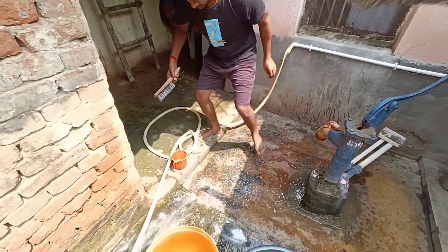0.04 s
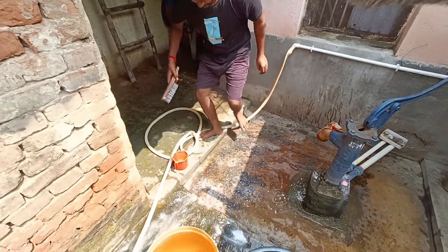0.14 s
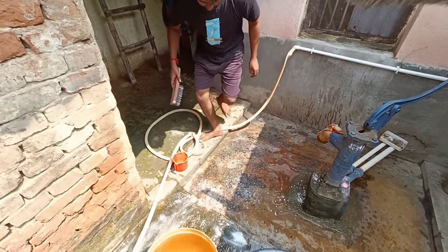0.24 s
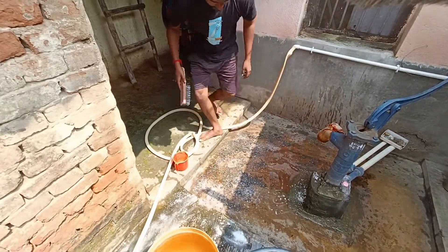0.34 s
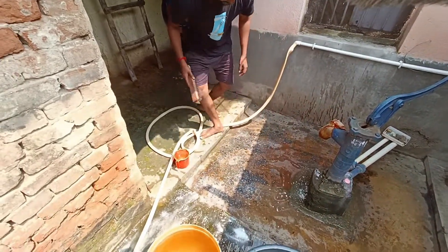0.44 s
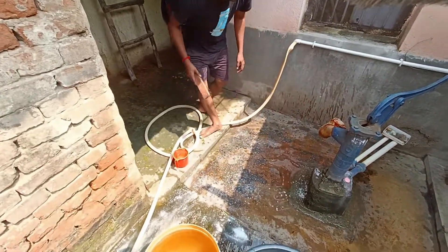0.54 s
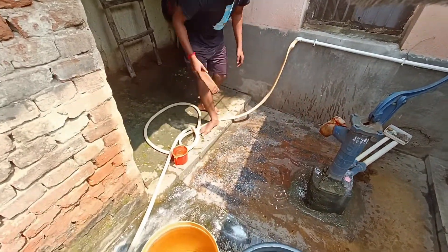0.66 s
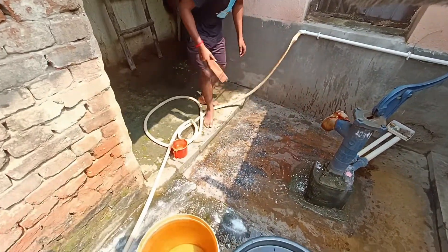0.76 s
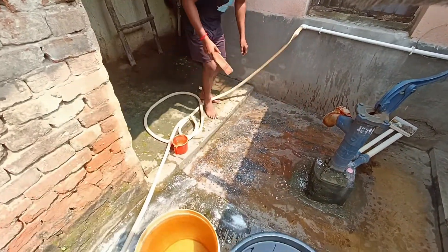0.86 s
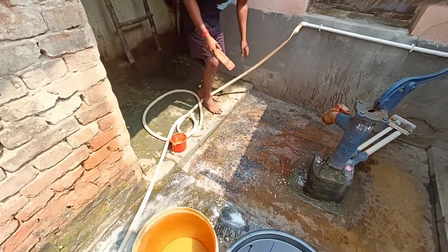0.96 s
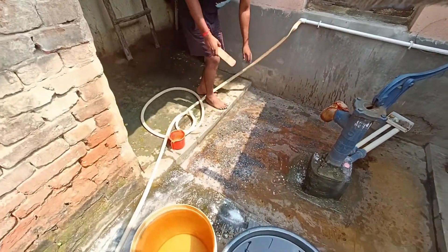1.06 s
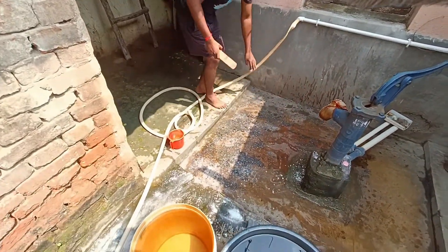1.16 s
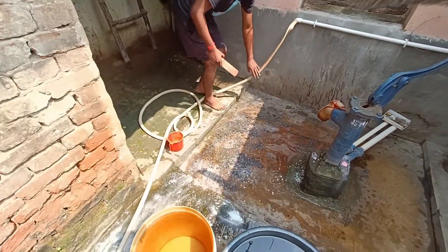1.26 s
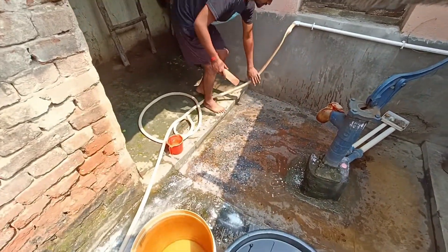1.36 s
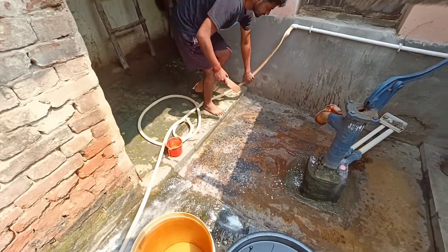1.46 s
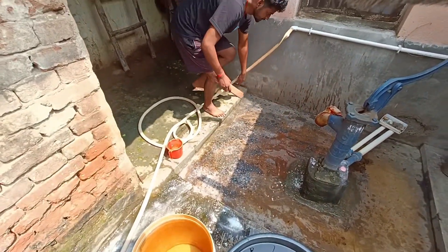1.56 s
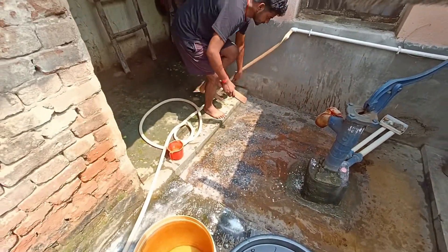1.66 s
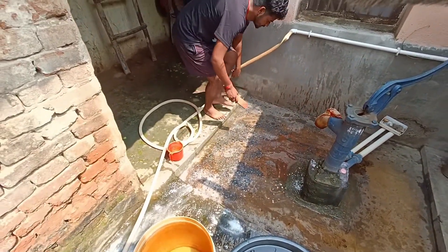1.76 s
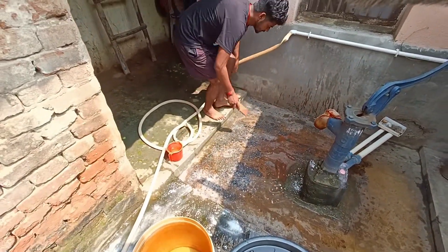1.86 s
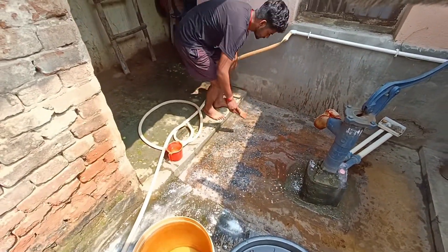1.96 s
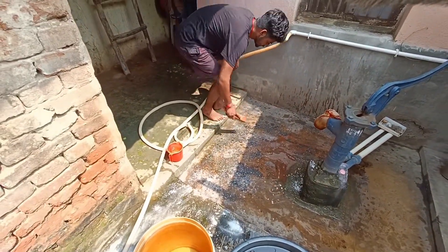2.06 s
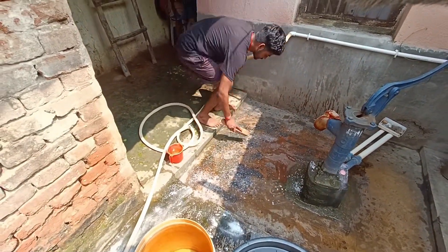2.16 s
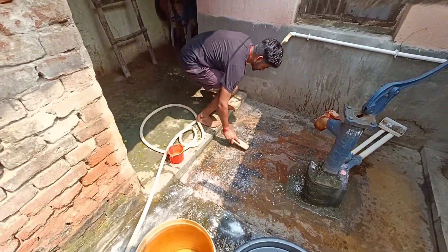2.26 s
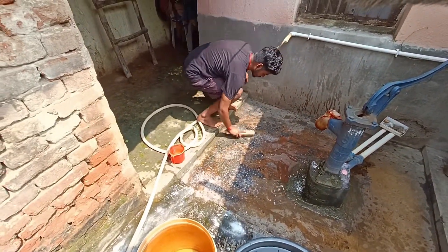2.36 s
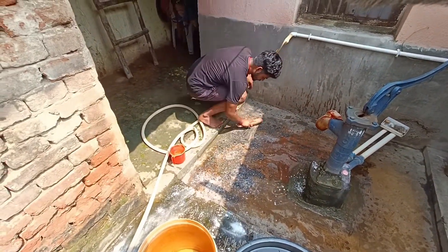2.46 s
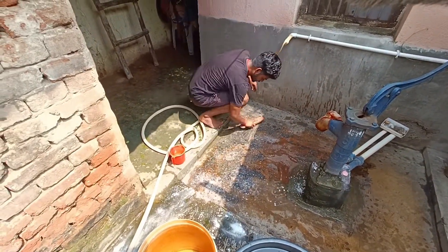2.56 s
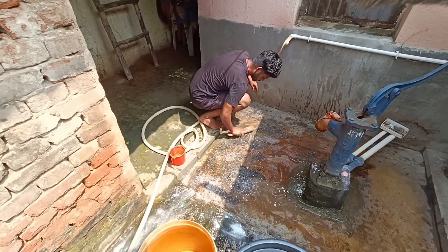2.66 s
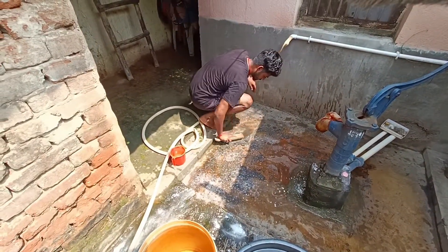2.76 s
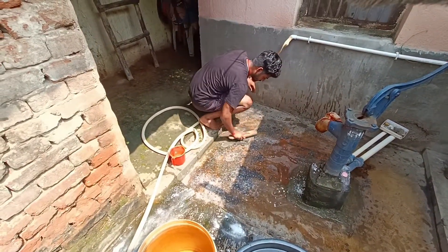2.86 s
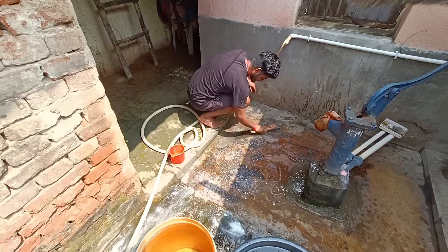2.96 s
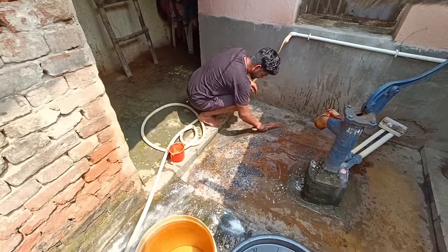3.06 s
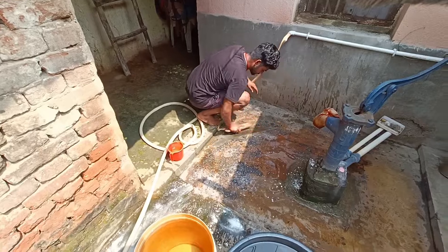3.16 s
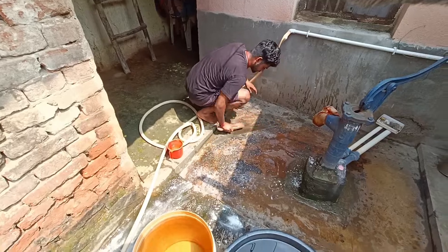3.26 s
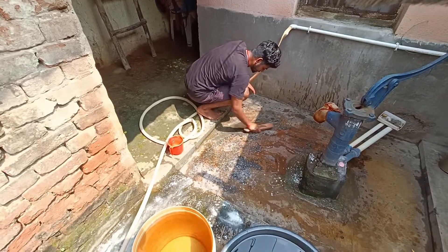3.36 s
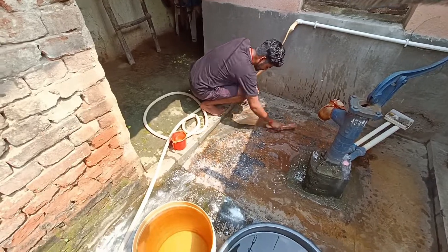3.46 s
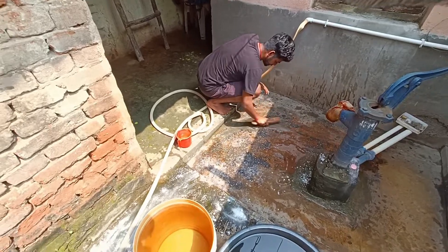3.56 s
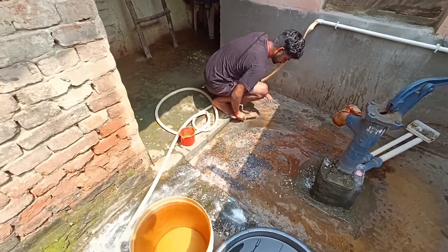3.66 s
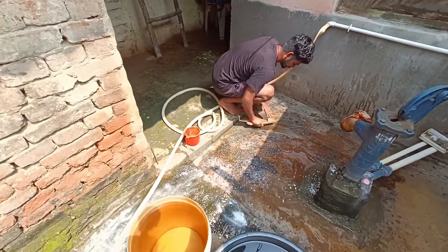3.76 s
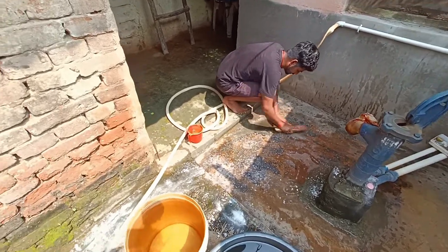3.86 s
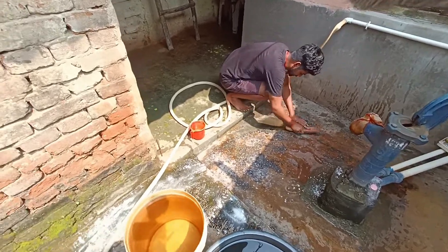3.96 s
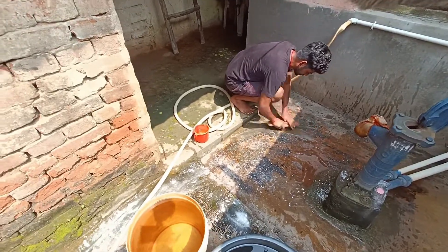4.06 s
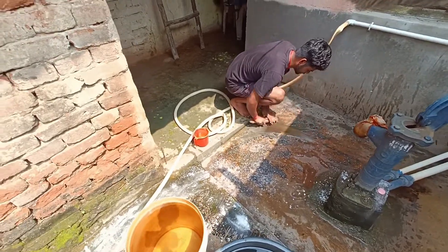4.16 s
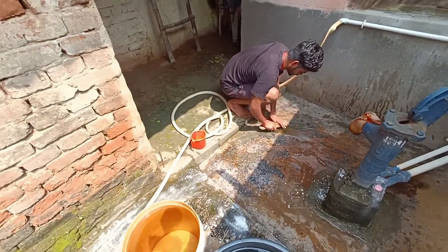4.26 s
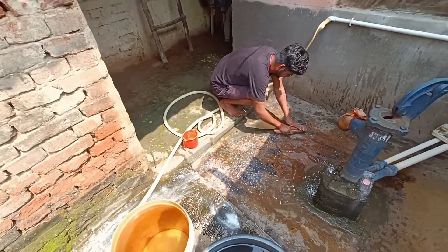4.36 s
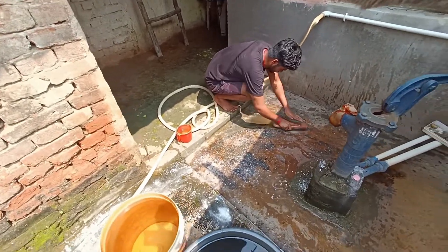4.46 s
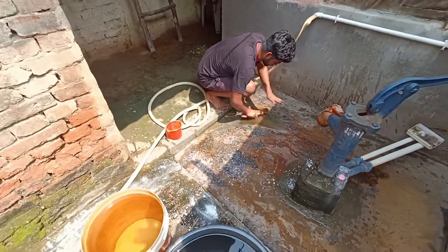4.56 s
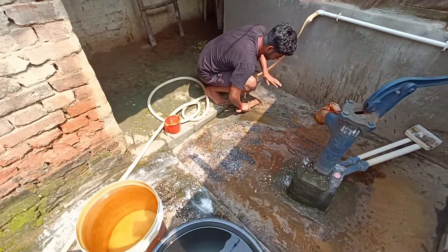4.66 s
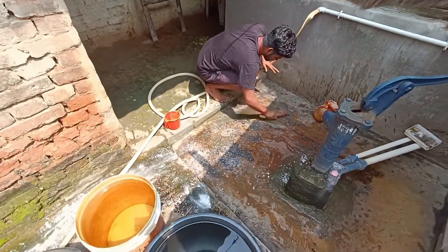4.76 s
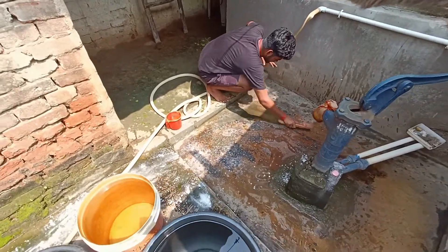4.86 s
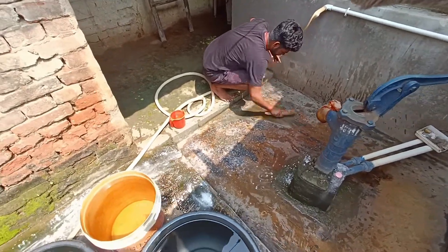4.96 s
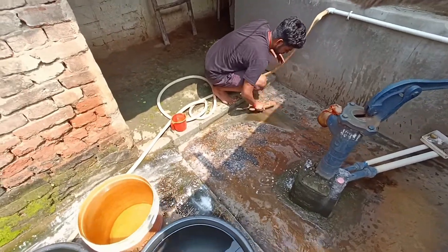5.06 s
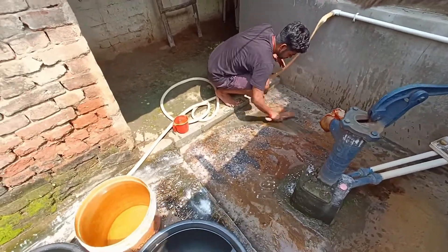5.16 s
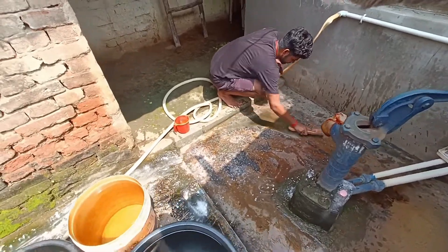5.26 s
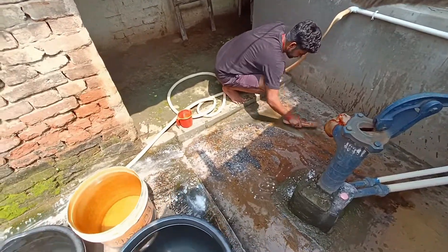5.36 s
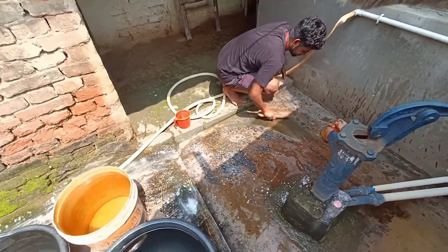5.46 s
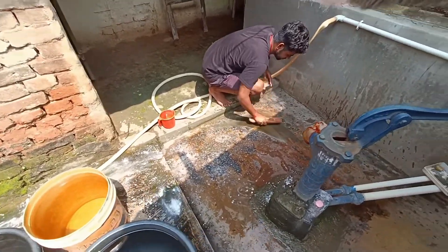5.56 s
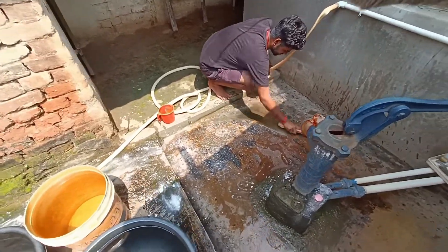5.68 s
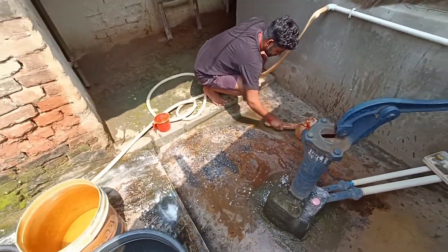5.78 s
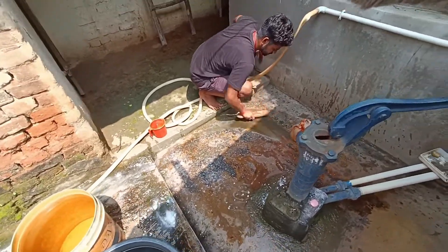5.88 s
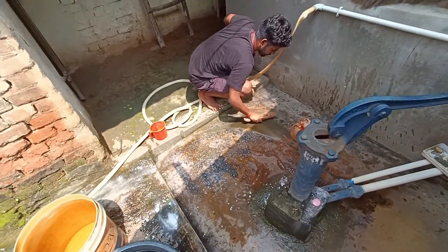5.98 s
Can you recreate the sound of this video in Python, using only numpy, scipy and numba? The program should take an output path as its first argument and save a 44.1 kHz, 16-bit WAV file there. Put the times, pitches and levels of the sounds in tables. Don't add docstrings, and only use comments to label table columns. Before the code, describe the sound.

A small walled yard, heard a few metres away on a phone, nearly mono, with a very short diffuse tail. Faint low hum, soft air hiss and swelling wind rumble run throughout. At 0.05 s a wet foot makes a bright tick; at 0.6 s comes the loudest step tap, another tap at 0.8, and gritty shuffling until about 1.1. Faint taps and scuffs follow at 1.25 to 1.6, then a cluster of small wet clicks and scuffs from 2.1 to 2.4. At 2.4 s the wooden brush lands with a short knock. From 2.45 s it scrubs in quick back-and-forth strokes, roughly every quarter second, becoming slightly faster and stronger. Bristles rasp with a bright scratchy ring, water hisses off them, and the block's hollow woody rattle and soft bumps thin out as the grip tightens. Low wind puffs thud near 4.1 and 5.4; scrubbing continues to the cut at 6 s.

```python
import sys
import numpy as np
from scipy import signal
from scipy.fft import rfft, irfft, next_fast_len
from scipy.io import wavfile
from scipy.ndimage import uniform_filter1d
from numba import njit

SR = 44100
rng = np.random.default_rng(int(sys.argv[2]) if len(sys.argv) > 2 else 0)


def invert_db(x):
    u = np.asarray(x, float) / 20
    return 10 ** u


def master_out(mix):
    frames = np.transpose(np.atleast_2d(mix))
    ceiling = np.clip(frames, -1, 1)
    pcm = np.round(ceiling * 32767).astype(np.int16)
    wavfile.write(sys.argv[1], SR, pcm)


N = 265482
LANDING_S = 2.397


def level(x, db):
    return x * invert_db(db) / np.sqrt(np.mean(x ** 2))


def to_db(gain):
    return 20 * np.log10(np.maximum(gain, 10 ** -5.5))


def colour(x, points):
    size = next_fast_len(N)
    hz, db = np.transpose(points)
    bins_hz = np.arange(size // 2 + 1) * SR / size
    gain = invert_db(np.interp(np.log(bins_hz + 1), np.log(hz), db, -120, -120))
    return level(irfft(rfft(x, size) * gain, size)[:N], 0)


@njit
def svf(x, hz, width):
    y, band, low = np.empty(len(x)), 0., 0.
    for i in range(len(x)):
        g, k = np.tan(np.pi * hz[i] / SR), width / hz[i]
        v = (band + g * (x[i] - low)) / (1 + g * (g + k))
        band, low, y[i] = 2 * v - band, low + 2 * g * v, k * v
    return y


def walk(rate):
    k = int(SR / rate)
    held = np.repeat(rng.standard_normal(N // k + 1), k)
    return 1.09 * uniform_filter1d(uniform_filter1d(held, k), k)[:N]


def snaps(share, spread_db, bunch_db, bunch_rate):
    when, sign, size = rng.random(N), rng.standard_normal(N), rng.exponential(size=N)
    return (when < share) * sign * invert_db(spread_db * size + bunch_db * walk(bunch_rate))


def rings(x, centre_hz, width_hz, count, spread, patchy_db, rate):
    out = 0
    for offset in np.linspace(-1, 1, count):
        hz = np.clip(centre_hz * np.exp(spread * (offset + 0.323 * walk(rate / 2))), 100, 9000)
        out = out + invert_db(patchy_db * walk(rate)) * svf(x, hz, width_hz)
    return level(out, 0)


def swing(share, fastest):
    bent = np.clip(share, 0, 1) ** (np.log(.5) / np.log(fastest))
    return np.maximum(np.sin(np.pi * bent), 0)


def hand():
    # start in seconds, spray level in dB, share of the stroke (0-1) where it is fastest,
    # tuft ring level in dB, rise of that ring along the stroke in dB. A stroke ends where the next begins.
    strokes = [(2.443, -35.5, 0.47, -38, 0), (2.711, -37, 0.54, -40.5, 4), (2.959, -35, 0.28, -34.5, 1),
               (3.208, -34, 0.47, -36.5, -6.5), (3.415, -33.5, .33, -35, 1.5),
               (3.645, -32.5, 0.46, -35, -2.5), (3.875, -34.5, 0.38, -35, 6.5), (4.124, -34, 0.43, -34, 6),
               (4.366, -34, 0.4, -33.5, 6), (4.616, -32, 0.47, -32, 2.5), (4.818, -33.5, 0.41, -31, 3),
               (5.044, -32.5, 0.55, -33, 8.5), (5.264, -33.5, 0.3, -32.5, -5), (5.476, -33, 0.48, -34, 2),
               (5.69, -33.5, 0.32, -34, -1.5), (5.91, -33, 0.51, -30, 6)]
    # level of bristles flipping over in dB,
    # share of the stroke (0-1) with a rough patch, the patch's half length as a share,
    # block level there in dB, lower tuft level there in dB.
    catches = [(-45.5, 0.41, 0.23, -36, -32.5), (-44.5, 0.6, 0.16, -46.5, -35),
               (-40.5, 0.9, 0.048, -49.5, -47), (-41.5, 0.61, 0.21, -41, -35.5),
               (-43.5, 0.29, 0.083, -42.5, -34.5), (-44, 0.57, 0.18, -40.5, -38),
               (-40.5, 0.43, 0.29, -53, -40), (-43.5, 0.59, 0.3, -41.5, -37),
               (-37.5, 0.59, 0.12, -62, -36.5), (-43, 0.64, 0.28, -43, -35.5),
               (-41.5, 0.43, 0.19, -50.5, -35), (-43.5, 0.71, 0.2, -42, -35.5),
               (-36.5, 0.24, 0.24, -69, -37), (-47.5, 0.71, 0.18, -44, -43), (-37.5, 0.36, 0.088, -50, -37),
               (-45, 0.51, 0.087, -57, -34.5)]
    # tufts, lower tufts, block and spray, all in dB.
    landing_db = (-42, -36.5, -43, -44)
    # time in seconds, pitch in Hz.
    lean = [(2.45, 3950), (2.53, 4280), (2.62, 4260), (2.69, 3830), (2.72, 4200), (2.98, 3930),
            (3.08, 4280), (3.49, 4020), (3.53, 4190), (3.94, 4100), (4.25, 4280), (5.29, 4190),
            (5.34, 4310), (5.71, 4110), (5.79, 4430), (5.85, 4130), (6.02, 4210)]
    # time in seconds, pitch in Hz.
    grip = [(2.4, 1640), (2.7, 1550), (3.0, 1407), (6.02, 1320)]
    last_end_s, stops_at = 6.13, 0.98
    tuft_power, body_power, spray_power = 0.95, 0.38, 0.94
    bite_s, pull_bite_s, flip_s, landing_s = .002, .012, 0.047, 0.02
    rest_db = -48.5

    t = np.arange(N) / SR
    starts = np.array([row[0] for row in strokes] + [last_end_s])
    k = np.clip(np.searchsorted(starts, t, side="right") - 1, 0, len(strokes) - 1)
    start, spray_db, fastest, tuft_db, rise_db = np.array(strokes)[k].T
    flip_db, place, half, block_db, lower_db = np.array(catches)[k].T
    share, moving = (t - start) / np.diff(starts)[k], t >= starts[0]
    speed = np.minimum(1.24 * swing(share / stops_at, 0.4), 1)
    bite = np.clip((t - start) / np.where(k % 2, pull_bite_s, bite_s), 0, 1)
    flip = bite * invert_db(flip_db) * np.exp(-np.abs(t - start) / flip_s)
    patch = moving * np.exp(-((share - place) / half) ** 2)
    landing = np.clip((t - LANDING_S) / bite_s, 0, 1) * np.exp(-np.abs(t - LANDING_S) / landing_s)
    rest = moving * invert_db(rest_db)
    drag = invert_db(tuft_db + rise_db * (share - .5))
    body = drag * speed ** body_power + rest

    tuft = (drag * speed ** tuft_power) ** 2 + (invert_db(1.5) * flip) ** 2 + rest ** 2
    lower = (invert_db(-10) * body) ** 2 + (invert_db(3) * flip) ** 2 + (invert_db(lower_db) * patch) ** 2
    block_base = invert_db(-21 - 3 * (t - 4.5)) * body
    block = block_base ** 2 + flip ** 2 + (invert_db(block_db) * patch) ** 2
    flung = invert_db(spray_db) * swing(share / stops_at, fastest) ** spray_power
    spray = flung ** 2 + rest ** 2
    landed = np.square(invert_db(landing_db)[:, None] * landing)
    tuft_level, lower_level, block_level, spray_level = to_db(np.sqrt(landed + [tuft, lower, block, spray]))

    tuft_hz = np.interp(t, *np.transpose(lean))
    block_hz = np.interp(t, *np.transpose(grip)) * (1 + 0.13 * patch - 0.16 * flip / invert_db(flip_db))
    return (tuft_level, lower_level - tuft_level, block_level - tuft_level, spray_level - tuft_level,
            tuft_hz, block_hz)


def brush():
    # frequency in Hz, level in dB per Hz.
    block_tone = [(150, -17), (250, -9), (274, -20.5), (669, -3), (884, 0), (1500, 1), (1880, 0),
                  (2300, -12.5), (2990, -1), (5060, -120)]
    # frequency in Hz, level in dB per Hz.
    spray_tone = [(2940, -39), (5000, -31), (5320, -9), (6080, -1), (7620, -10), (8970, 0), (10900, -1.5),
                  (12300, 4), (14000, -2.5), (15700, -6.5)]
    # frequency in Hz, level in dB per Hz.
    scrape_tone = [(1500, -19.5), (2200, -5), (3000, -1.5), (3600, 1.5), (4600, -2.5), (5200, -9.5),
                   (6000, -20)]
    t = np.arange(N) / SR
    tuft_db, lower_db, block_db, spray_db, tuft_hz, block_hz = hand()
    tuft_hz = 4200 + 1.36 * (tuft_hz - 4200)
    block_db = uniform_filter1d(block_db, int(0.0049 * SR))

    slips = snaps(.4, spread_db=0.5, bunch_db=2.0, bunch_rate=60)
    tuft = rings(slips, tuft_hz, 240.0, count=2, spread=0.021, patchy_db=2.0, rate=55)
    tuft = svf(tuft, tuft_hz, 1130.0)
    lower_slips = slips + 0.35 * snaps(.4, 2.4, 1.8, 50)
    lower = rings(lower_slips, 2866, 220.0, count=3, spread=0.047, patchy_db=2.0, rate=50)
    lower = svf(lower, np.full(N, 2850.), 1300.0)
    scrape = colour(snaps(.3, spread_db=-0.6, bunch_db=3.3, bunch_rate=41), scrape_tone)

    catches = colour(snaps(.3, spread_db=1.68, bunch_db=0.53, bunch_rate=32), block_tone)
    modes = rings(catches, 989, 38.0, count=9, spread=0.755, patchy_db=7.0, rate=26)
    held = rings(catches, block_hz, 260.0, count=2, spread=0.11, patchy_db=0.0, rate=32)
    block = 0.71 * catches + 0.71 * modes + 0.87 * held
    loose_until_s, loose_fade_s = 2.62, 0.09
    loose = np.exp(-np.maximum(t - loose_until_s, 0) / loose_fade_s)
    clear = rings(catches, 1580, 70., count=2, spread=0.034, patchy_db=-1.0, rate=11.9)
    block = level(block, 0) * (1 - 0.26 * loose) + invert_db(-3) * loose * clear
    thin = np.clip(.12 * (t - loose_until_s), 0, .9)
    block = block - thin * svf(block, np.full(N, 400.), 560.0)

    parts = level(tuft, -0.72) + invert_db(-11) * scrape
    parts = parts + invert_db(lower_db) * (level(lower, -1.5) + invert_db(-6) * scrape) + invert_db(block_db) * block
    swell_db = uniform_filter1d(np.maximum(tuft_db + spray_db, -75), int(0.004 * SR))
    swell_db = swell_db - 60 * (tuft_db < -100)
    spray = colour(slips + 5.4 * snaps(.6, 0.68, 1.35, 30), spray_tone)
    bite = uniform_filter1d(invert_db(tuft_db), int(0.0044 * SR))
    return bite * parts + invert_db(swell_db + 0.18) * spray


def knock():
    # pitch in Hz, level in dB, time to fade by 60 dB in seconds.
    block_rings = [(880, -33, 0.076), (1790, 5.5, 0.055), (2600, -19, .06), (3030, 3.5, 0.07),
                   (3950, -11, 0.065), (4870, -4, 0.069)]
    knock_s, knock_db = 2.3975, -27
    t, out = np.arange(SR // 5) / SR, np.zeros(N)
    ring = 0
    for hz, db, t60_s in block_rings:
        ring = ring + invert_db(db) * np.sin(2 * np.pi * hz * t) * np.exp(-np.log(1000) * t / t60_s)
    for late_s, db in ((0, -12), (.0021, 4.5), (.0038, -9)):
        start = int((knock_s + late_s) * SR)
        out[start:start + len(t)] += invert_db(knock_db + db - 15.5) * ring
    return out


def bumps():
    # time in seconds, peak level in dB, pitch in Hz.
    ridges = [(2.481, -45, 318), (2.56, -48, 420), (2.958, -46, 250), (3.874, -54, 363),
              (4.369, -53.5, 410), (4.616, -57, 242), (4.735, -50, 318), (5.042, -57, 194),
              (5.683, -54, 253), (5.911, -55.5, 250)]
    t, out = np.arange(SR // 8) / SR, np.zeros(N)
    swell = t / 0.022 * np.exp(1 - t / 0.016)
    for s, db, hz in ridges:
        noise = rng.standard_normal(len(t))
        burst = level(svf(noise, np.full(len(t), 1. * hz), 0.64 * hz), db - 5) * swell
        start = int(s * SR)
        out[start:start + len(t)] += burst[:N - start]
    return out


def footwork():
    # time in seconds, sole level in dB, fade in seconds, spray and heel in dB relative to the sole.
    steps = [
        (.05, -63, .018, 11, -14),
        (.595, -54, .024, -24, -11),
        (1.426, -61.5, .032, -10.5, -13),
        (2.103, -67, 0.033, -4, -6),
        (2.134, -65, .012, -2, -16),
    ]
    # start in seconds, length in seconds, sole level in dB, spray and heel in dB relative to it.
    drags = [
        (.65, .27, -58, -12, -6),
        (.83, .29, -58, -9, -3.5),
        (1.201, 0.08, -78.5, -7, -4),
        (1.55, 0.076, -81.5, 0, -8),
        (2.14, 0.056, -71, -7, -20),
        (2.199, .1, -60.5, -3.5, -13),
        (2.283, 0.19, -71, -4.5, -2),
    ]
    t, out = np.arange(N) / SR, 0
    for s, db, fade_s, splash_db, heel_db in steps:
        shape = np.clip((t - s) / .005, 0, 1) * np.exp(-np.abs(t - s) / fade_s)
        out = out + invert_db(db + np.array([[0], [splash_db], [heel_db]])) * shape
    for s, length_s, db, splash_db, heel_db in drags:
        shape = np.minimum(1.18 * swing((t - s) / length_s, .5), 1) ** 1.3
        out = out + invert_db(db + np.array([[0], [splash_db], [heel_db]])) * shape
    sole_db, splash_db, heel_db = to_db(out)
    return sole_db, splash_db - sole_db, heel_db - sole_db


def feet():
    # frequency in Hz, level in dB per Hz.
    sole_tone = [(1500, -33), (2100, -13.5), (2600, 1), (3400, 2), (4500, -3), (5300, -15), (6000, -25)]
    heel_tone = [(300, -15), (760, -8.5), (1300, -2.5), (1900, -5.5), (2500, -7)]
    splash_tone = [(4500, -26), (5400, -14), (6200, 0), (7600, -14), (9000, -2.5), (10500, -4),
                   (12000, -8.5), (15700, -8)]
    sole_db, splash_db, heel_db = footwork()
    grit = snaps(0.1, spread_db=2.0, bunch_db=1.2, bunch_rate=70)
    sole, heel = colour(grit, sole_tone), colour(grit, heel_tone)
    sole = level(sole + 0.73 * rings(sole, 3020, 200., count=5, spread=0.41, patchy_db=2.5, rate=40), 0)
    heel = level(heel + 0.77 * rings(heel, 974, 120., count=3, spread=0.39, patchy_db=2, rate=30), 0)
    splash = colour(grit + 0.18 * snaps(0.27, 1.4, 1.8, 40.7), splash_tone)
    return invert_db(sole_db - 0.36) * (sole + invert_db(heel_db - 0.5) * heel + invert_db(splash_db + 2.0) * splash)


def taps():
    # time in seconds, peak level in dB, pitch in Hz, width as a share of the pitch.
    clicks = [
        (0.0538, -36, 10100, 0.43),
        (0.2313, -60, 2920, 0.31),
        (0.595, -31, 2500, 0.59),
        (0.797, -37, 2900, 0.42),
        (1.256, -51.5, 3550, 0.43),
        (1.4294, -53, 3200, 0.67),
        (2.1034, -52, 1410, 0.94),
        (2.135, -41.5, 3500, 0.29),
        (2.153, -41, 3520, 0.63),
        (2.2207, -40, 3820, 0.41),
    ]
    wall_echo_s, wall_db = 0.00223, -3
    out, t = np.zeros(N), np.arange(200) / SR
    for s, db, hz, width in clicks:
        fading = np.pi * width * hz * t
        click = invert_db(db + 4.0) * np.sin(2 * np.pi * hz * t) * fading * np.exp(-fading)
        for start, gain in ((s + 0.0008, 1), (s + 0.00064 + wall_echo_s, invert_db(wall_db))):
            out[int(start * SR):int(start * SR) + len(t)] += gain * click
    return out


def wind():
    # time in seconds, rumble level in dB.
    gusts = [(0, -69.5), (.52, -64), (.65, -64), (.8, -54.5), (1.15, -62.5), (1.39, -62), (1.95, -59),
             (2.09, -72), (2.3, -59.5), (3.3, -64), (4.0, -57), (4.27, -62.5), (4.75, -58.5), (5.18, -60),
             (5.42, -53.5), (5.55, -61.5), (5.8, -60), (6.02, -66)]
    # time in seconds, level in dB.
    thuds = [
        (.18, -68),
        (3.39, -66),
        (4.12, -53.5),
        (4.4, -59.5),
        (4.69, -59.5),
        (5.4, -60),
        (5.8, -78),
    ]
    t = np.arange(N) / SR
    gust_db = np.interp(t, *np.transpose(gusts))
    puffs = invert_db(-71.5 + 0.2 * (gust_db - gust_db.mean()))
    for s, db in thuds:
        puffs = puffs + invert_db(db) * np.exp(-((t - s) / 0.043) ** 2)
    return gust_db, to_db(puffs) - gust_db


def background():
    # pitch in Hz, rms level in dB.
    hum_lines = [(250, -73), (134, -81.5), (308, -90), (600, -99.5)]
    # frequency in Hz, level in dB per Hz.
    air_tone = [(60, -51), (95, -13), (140, -11.5), (220, -16), (340, -20), (1000, -24), (1350, -31),
                (4100, -33.5), (7900, -41), (11000, -34), (12000, -29.5), (15700, -29.5)]
    air_db = -77
    t = np.arange(N) / SR
    rumble_db, puffs_db = wind()
    rumble = colour(rng.standard_normal(N), [(10, -14), (22, -3.5), (34, -5.5), (48, -16.5), (100, -28.5)])
    puffs = colour(rng.standard_normal(N), [(45, -13), (64, -3.0), (85, -11.5), (150, -18.0), (220, -27)])
    puffs = invert_db(puffs_db - 1.5 + 3.4 * walk(8.3)) * puffs
    hum = 0
    for hz, db in hum_lines:
        hum = hum + invert_db(db + 0.21 * walk(6.15)) * np.sqrt(2) * np.sin(2 * np.pi * hz * t)
    air = invert_db(air_db + 4.5 + 0.71 * walk(1.6)) * colour(rng.standard_normal(N), air_tone)
    return invert_db(rumble_db) * (rumble + puffs) + hum + air


def flicker(x):
    # centre in Hz, width in Hz, threshold in spreads of the random level (lower is on more often).
    bands = [(5400, 450, .4), (7200, 650, .2), (7950, 550, -.2), (15000, 1100, .9)]
    rate, ends_s = 30, 4.2
    t, out = np.arange(N) / SR, 0
    rarer = 1.6 * np.clip(t - ends_s + .5, 0, 2) + 9 * (t < LANDING_S)
    for hz, width, often in bands:
        on = uniform_filter1d(1. * (walk(rate) > often + rarer), SR // 100)
        band = signal.butter(4, (hz - width / 2, hz + width / 2), "band", fs=SR, output="sos")
        out = out + on * signal.sosfilt(band, x)
    return out


def scene():
    yard_t60_s, yard_db, flicker_db = 0.18, -11, 6
    near = brush() + knock() + bumps() + feet() + taps()
    t = np.arange(SR // 2) / SR
    fade = np.exp(-np.log(1000) * t / yard_t60_s) * np.minimum(t / 0.0049, 1)
    tails = rng.standard_normal((2, len(t))) * fade
    tails /= np.sqrt(np.sum(tails ** 2, axis=1, keepdims=True))
    wet, apart = signal.fftconvolve(near[None], tails)[:, :N]
    difference = invert_db(flicker_db - 10.5) * flicker(apart) * np.array([[1], [-1]])
    return near + invert_db(yard_db) * wet + background() + difference


def low_pass(x):
    return signal.sosfilt(signal.butter(12, 16930, fs=SR, output="sos"), x)


def record(dry):
    return low_pass(dry)


dry = scene()
out = record(dry)
master_out(out)
```